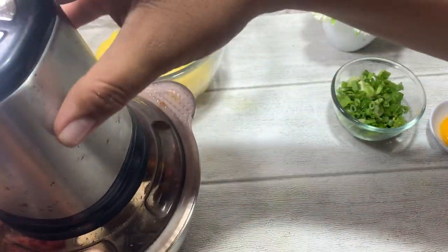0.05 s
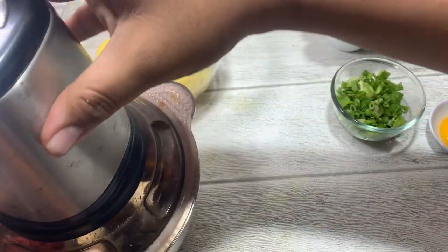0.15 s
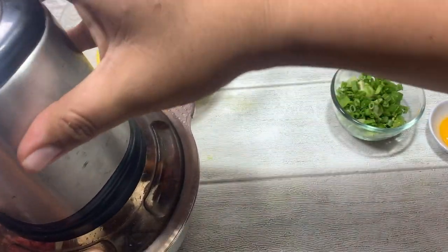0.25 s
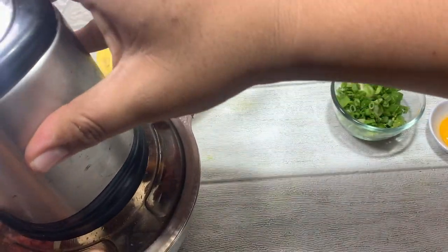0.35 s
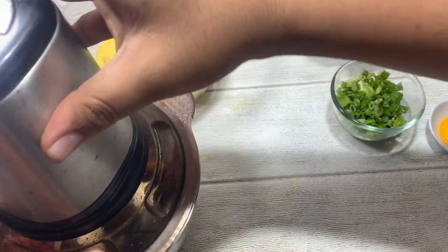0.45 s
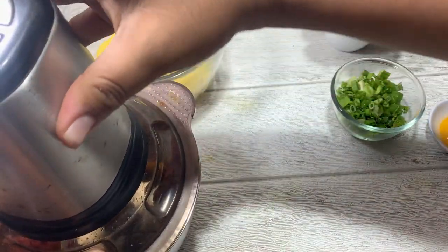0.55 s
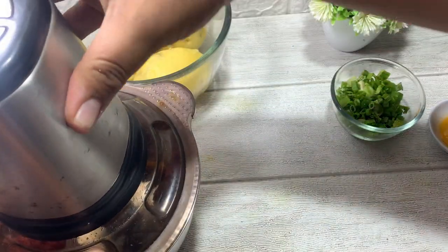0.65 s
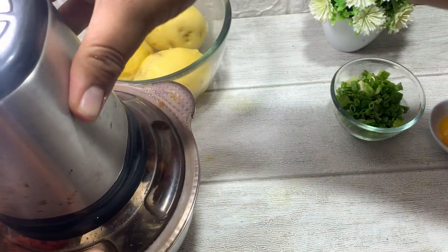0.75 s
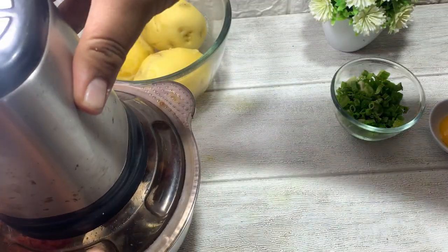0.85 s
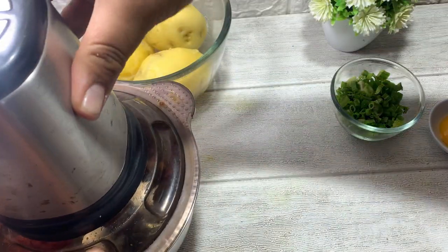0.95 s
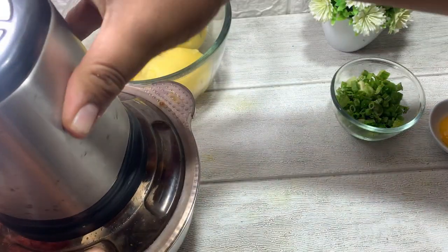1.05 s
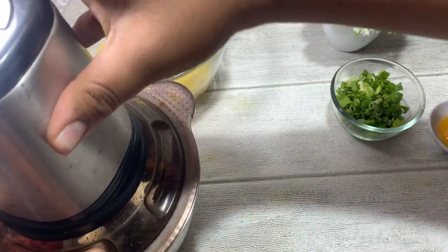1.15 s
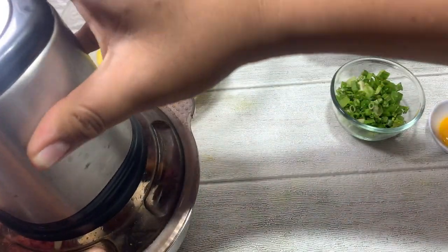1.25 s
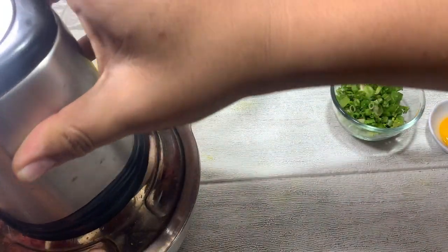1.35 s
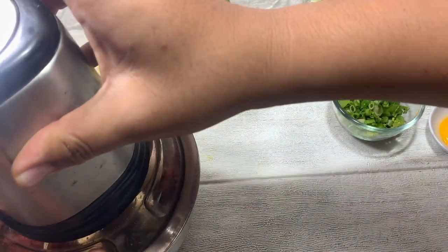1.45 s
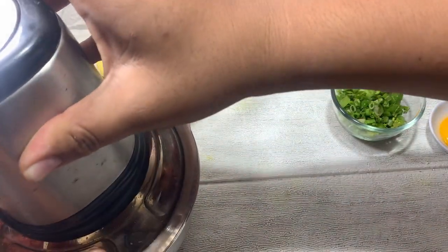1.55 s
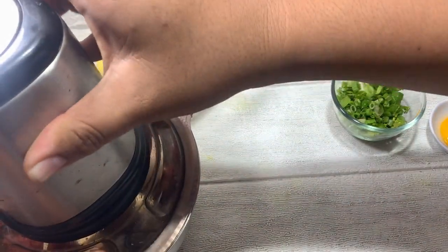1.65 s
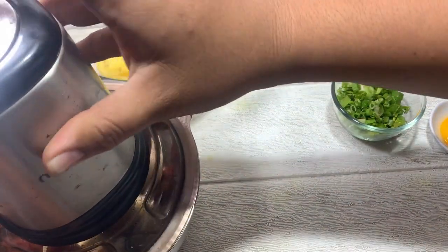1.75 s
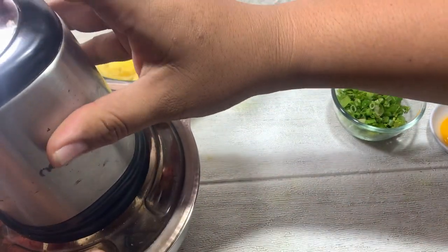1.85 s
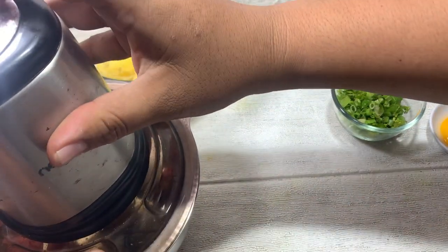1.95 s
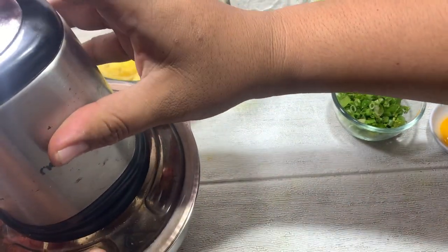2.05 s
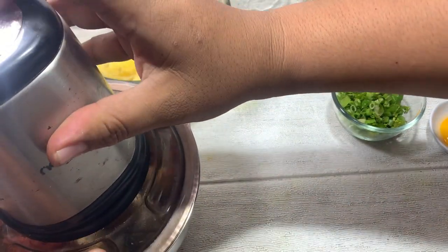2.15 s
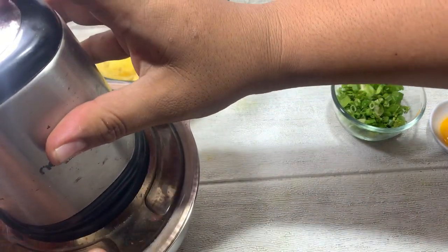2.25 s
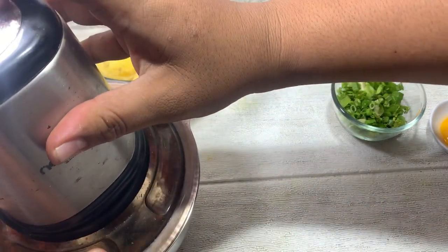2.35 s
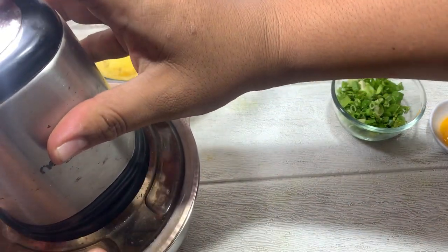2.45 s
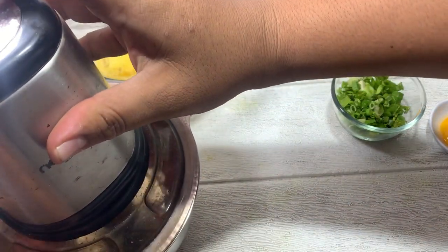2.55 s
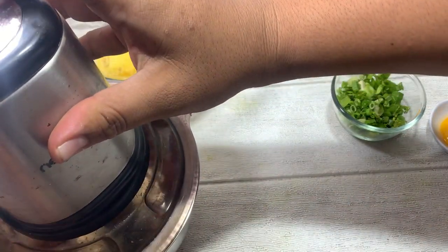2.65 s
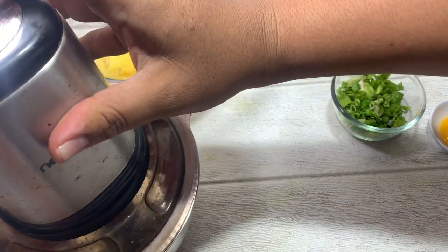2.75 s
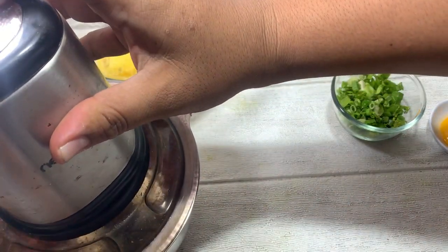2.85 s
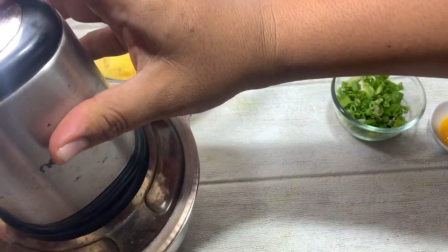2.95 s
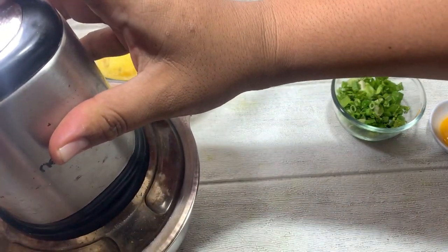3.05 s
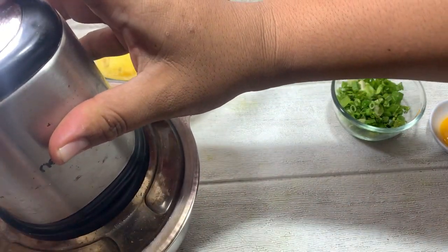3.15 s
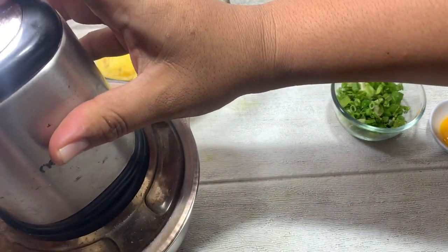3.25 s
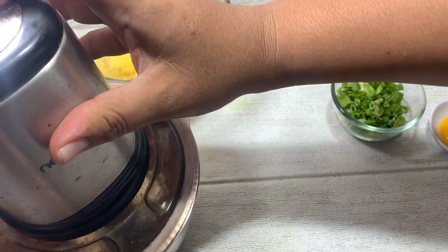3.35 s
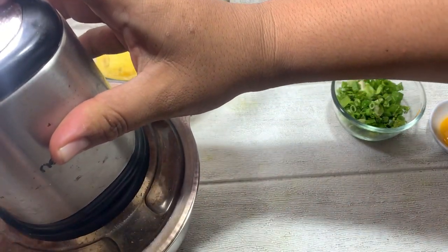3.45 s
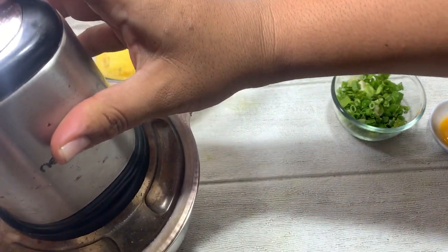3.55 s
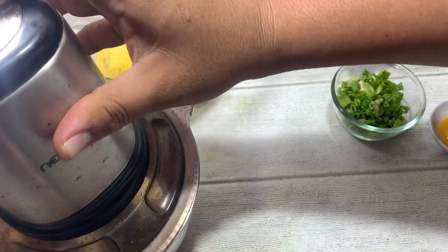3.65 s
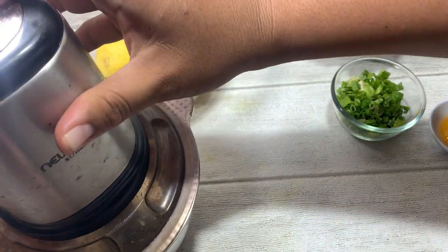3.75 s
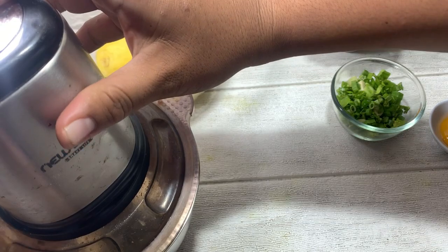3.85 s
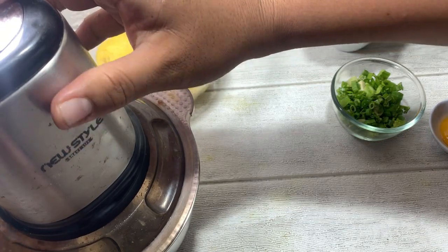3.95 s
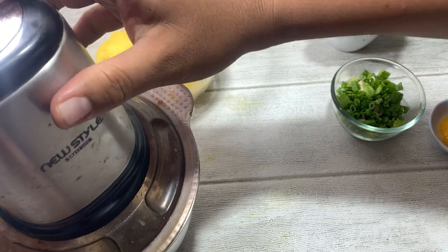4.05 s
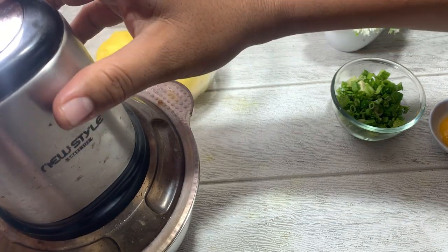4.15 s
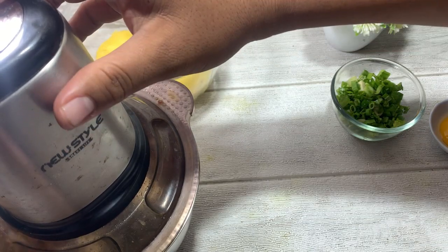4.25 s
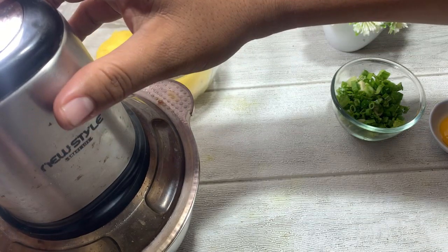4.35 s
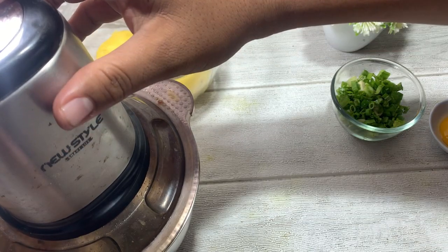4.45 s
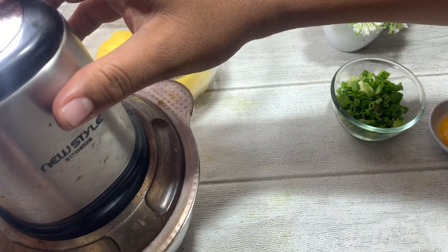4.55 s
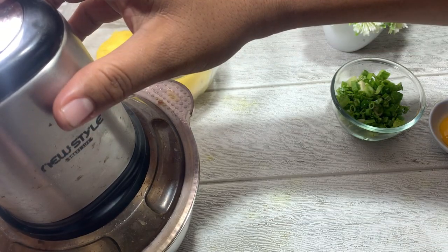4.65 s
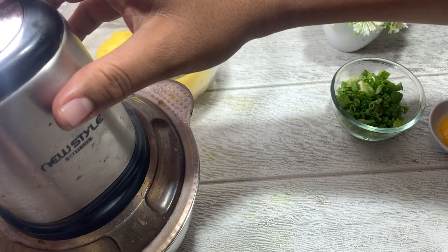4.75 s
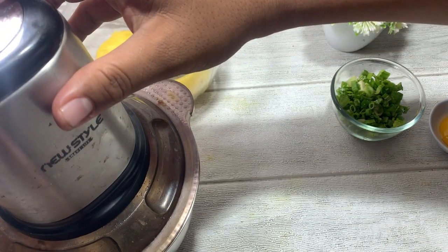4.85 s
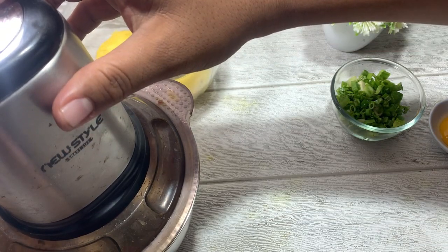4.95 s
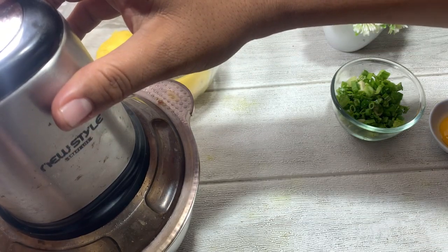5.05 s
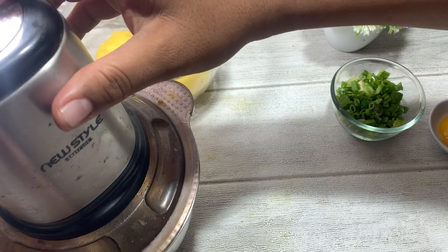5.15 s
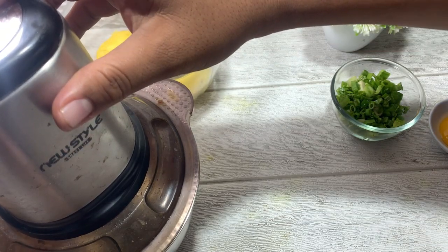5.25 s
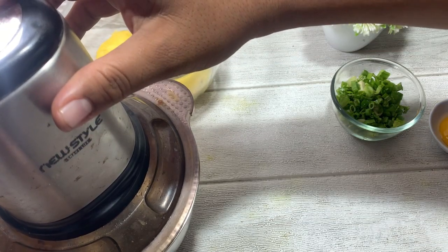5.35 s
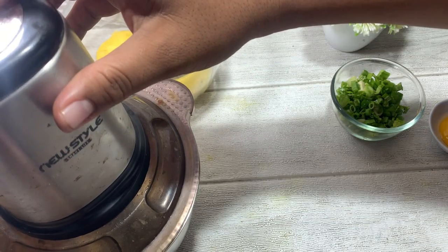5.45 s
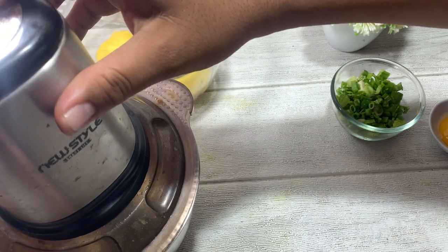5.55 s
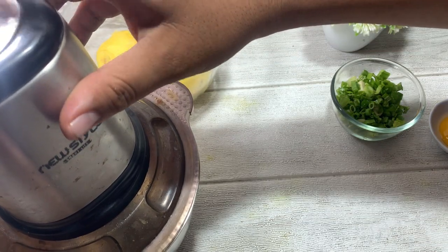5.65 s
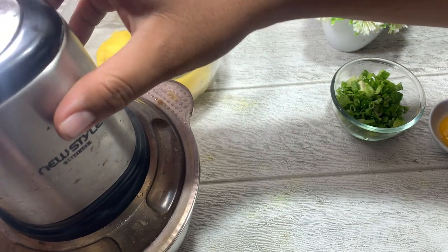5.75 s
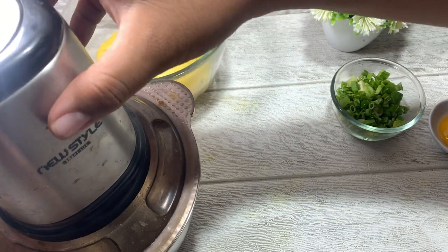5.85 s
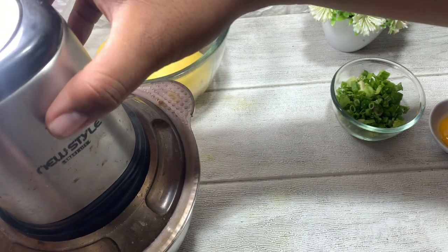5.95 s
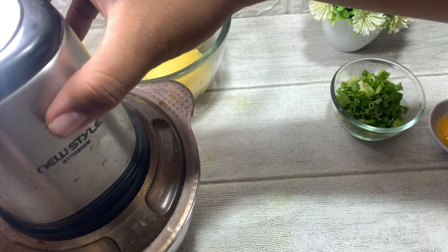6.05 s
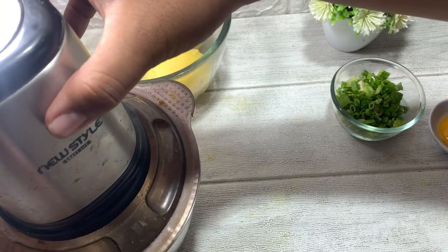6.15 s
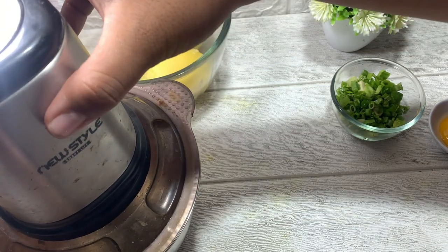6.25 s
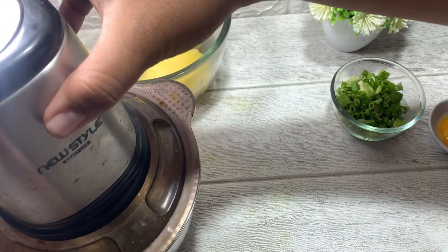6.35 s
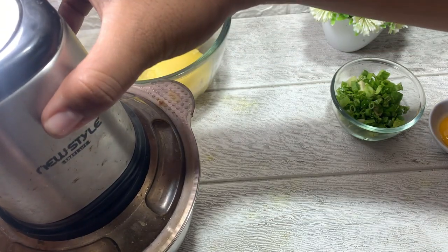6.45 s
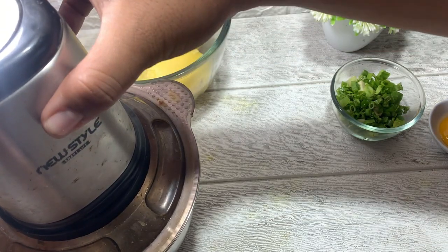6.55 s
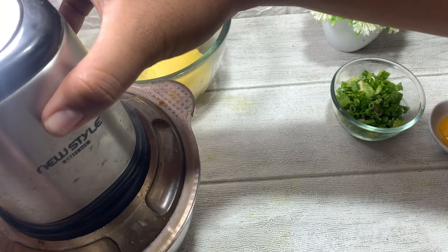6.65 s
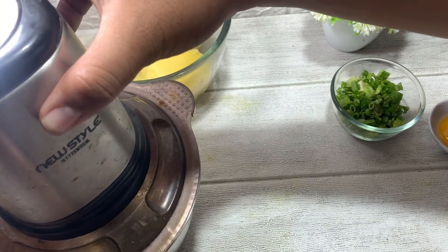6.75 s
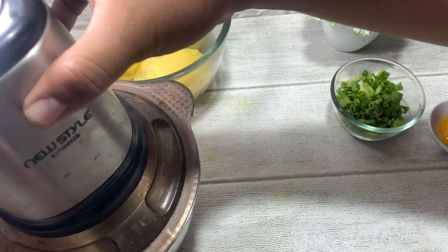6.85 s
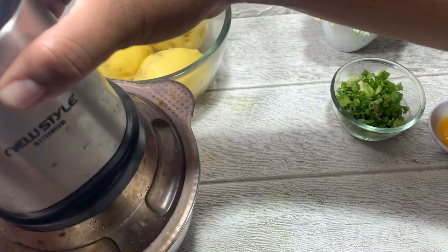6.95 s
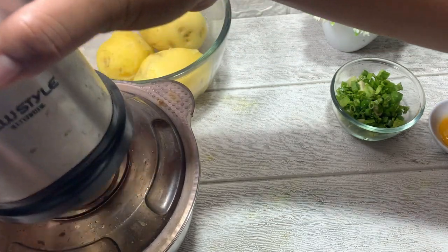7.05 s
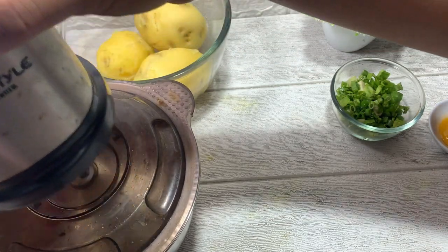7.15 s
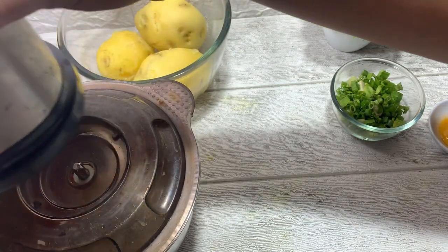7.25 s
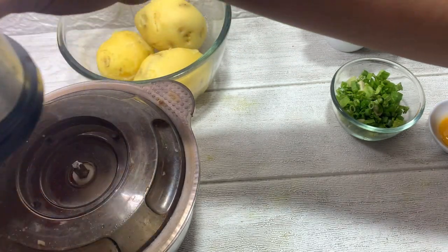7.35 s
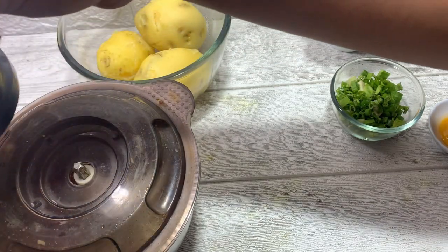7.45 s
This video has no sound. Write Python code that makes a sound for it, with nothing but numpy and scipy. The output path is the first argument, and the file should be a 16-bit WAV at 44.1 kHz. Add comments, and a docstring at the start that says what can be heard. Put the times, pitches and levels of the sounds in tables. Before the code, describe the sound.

A quiet kitchen, heard close in stereo with a short reverberation. Soft rumble, shuffling hands, a faint treble buzz and a thin wavering whistle lie behind. At 0.2-0.4 s light knocks sound on a lid, with a brief low rubbing tone; small contacts follow near 0.8 and 1.1. At 1.4 s the motor head drops home with a loud clunk, a table boom, a dying rattle and a dry finger scuff. At 2.2 s the chopper starts abruptly, spinning up quickly into a harsh, dense grind with motor whine, blade ring and lumpy knocks. Bright ticks on steel crowd 2.3-4.3, then thin out while the pitch slowly climbs. At about 5.7 s the switch is released: the bowl shudders, pitch falls, treble fades and churning slows into separate knocks, stopping by 7.0. Small soft knocks of lifting the head run to 7.5.

```python
"""In a quiet kitchen a hand seats the motor head of an electric food chopper, runs it and lets it coast to rest.
Random contacts of blades, food and gears excite the damped modes of housing and bowl; the rotor adds tones
in step with its turning. Hard bits tick on the steel, lumps knock, the lid rubs and sings.
Rumble, shuffling hands, a treble buzz and a thin whistle lie behind, and the room returns a short reverberation."""
import sys
import numpy as np
from scipy import signal
from scipy.fft import rfft, irfft, next_fast_len
from scipy.io import wavfile
from scipy.ndimage import uniform_filter1d, minimum_filter1d

SR = 44100
rng = np.random.default_rng(int(sys.argv[2]) if len(sys.argv) > 2 else 0)


def wav_record(signal):
    """Record a signal, one row per channel, as 16-bit PCM in the file named by sys.argv[1]."""
    frames = np.transpose(np.atleast_2d(signal))
    bounded = np.clip(frames, -1, 1)
    # unit amplitude maps onto the largest positive 16-bit level
    quanta = np.round(bounded * 32767).astype(np.int16)
    wavfile.write(sys.argv[1], SR, quanta)


def amplitude_ratio(level_db):
    """Convert a level in decibels to the matching linear amplitude (field) ratio."""
    exponent = np.asarray(level_db, float) / 20
    return 10 ** exponent


N = 330309

ON_S, OFF_S, STOP_S = 2.19, 5.66, 7.03    # switch pressed, switch let go, rotor at rest
FULL_SPEED = 370    # turns per s
TURNS_PER_PASS = 7.2    # rotor turns per blade pass
TABLE_BOOM_S, SCUFF_S = 1.42, 1.545    # the head drops home; a finger scuffs the lid


def rms_one(x):
    """Normalization: scales to unit mean power."""
    return x / np.sqrt(np.mean(x ** 2) + 1e-20)


def in_time(rows, outside=None):
    """Linear interpolation: the columns of a table at every sample."""
    s, *columns = np.transpose(rows)
    time = np.arange(N) / SR
    return [np.interp(time, s, column, outside, outside) for column in columns]


def drift(rate):
    """Low-passed noise: slow random change of spread 1, with rate in Hz."""
    r = np.exp(-80 * np.pi * rate / SR)    # computed at every 40th sample
    slow = signal.lfilter([1], [1, -2 * r, r * r], rng.standard_normal(N // 40 + 2002))[2000:]
    return np.interp(np.arange(N) / 40, np.arange(len(slow)), rms_one(slow))


def band(x, order, low_hz, high_hz):
    """Band-pass filtering: keeps the range between two corner frequencies."""
    return signal.sosfilt(signal.butter(order, [low_hz, high_hz], "band", fs=SR, output="sos"), x)


def dying(start_s, db, t60, rise_s):
    """Exponential decay: a gain that swells quickly and falls 60 dB in t60 seconds."""
    after = np.maximum(np.arange(N) / SR - start_s, 0)
    return amplitude_ratio(db - 60 * after / t60) * (1 - np.exp(-after / rise_s))


def resonate(x, hz, width_hz):
    """Damped resonance: a two-pole mode with gain 1 at its peak."""
    r = np.exp(-np.pi * width_hz / SR)
    poles = [1, -2 * r * np.cos(2 * np.pi * hz / SR), r * r]
    return signal.lfilter([(1 - r * r) / 2, 0, (r * r - 1) / 2], poles, x + 1e-18)


def body(x, low_hz, high_hz):
    """Modal superposition: the housing and bowl modes that lie in a range, in parallel."""
    # modes of housing and bowl: f/Hz, width/Hz, level/dB
    modes = [(76, 20, -6), (108.6, 27, -1.5), (136.2, 27.5, 2.5), (196.8, 44, 2), (295.4, 80.7, 6),
             (365.7, 94, 5), (483.5, 103.4, -4.5), (565, 19, -12), (633.4, 70, -15), (788, 207, -8),
             (950, 130, -5), (1130, 85, -4.5), (1242, 112, -8), (1556, 190, -10.5), (1740, 183, -14.5),
             (1890, 950, -44), (2459, 42, 13), (2930, 304, -13), (3170, 246, -11.5), (4416, 520, -27.5),
             (4820, 93, -36), (5790, 270, -27), (6600, 1600, -29.5), (8240, 420, -17.5), (9980, 440, -22.5),
             (11050, 230, -20), (11700, 6000, -30), (14200, 3000, -37), (15760, 330, -30)]
    out = 0
    for k, (hz, width_hz, db) in enumerate(modes):
        if low_hz < hz < high_hz:
            out = out + (-1) ** k * amplitude_ratio(db) * resonate(x, hz, width_hz)
    return out


def gripped(x):
    """Frequency modulation: modes slide a little in pitch as the hand's pressure changes."""
    sway_s, changes_per_s = .0008, 3.5
    heard_at = np.arange(N) + sway_s * SR * drift(changes_per_s)
    return rms_one(np.interp(heard_at, np.arange(N), x))


def grains(per_s, spread_db):
    """Shot noise: random contacts of uneven size and sign, at unit power."""
    sizes = amplitude_ratio(spread_db * np.minimum(rng.exponential(1, N), 4)) * rng.choice([-1, 1], N)
    return rms_one(sizes * (rng.random(N) < per_s / SR))


def bursts(rows, decay_s, sharp, rise_s=0.0026):
    """Impulsive excitation: each event (s, dB) is a click and a short puff of noise that swells and dies."""
    clicks = np.zeros(N)
    clicks[[round(s * SR) for s, db in rows]] = amplitude_ratio(np.array(rows)[:, 1])
    fall, rise = np.exp(-1 / (decay_s * SR)), np.exp(-1 / (rise_s * SR))
    puff = signal.lfilter([1 - rise], np.convolve([1, -fall], [1, -rise]), clicks + 1e-18)
    return sharp * clicks + puff * rng.standard_normal(N)


def wavering(cycles, wander, sway_db, rate=8):
    """Phase and amplitude modulation: a sine that wanders by radians and by dB."""
    sine = np.sqrt(2) * np.sin(2 * np.pi * cycles + wander * drift(rate))
    return sine * amplitude_ratio(sway_db * drift(4.4))


def motor(speed, turns):
    """Shot-noise excitation of modes: contacts come faster with speed and bunch at each blade pass."""
    # the run: t/s, table rumble level/dB, gear rattle level/dB
    run_levels = [(2.17, -53, -56), (2.205, -12, -13), (2.27, -19, -18.5), (2.6, -16, -20.5),
                  (2.72, -18.5, -20), (3.09, -17, -18), (3.3, -22, -18), (3.84, -17.5, -18.5),
                  (4.41, -21.5, -18.5), (5.0, -18.5, -17), (5.22, -22.5, -20), (5.52, -15, -16),
                  (5.82, -16, -21), (6.03, -21.5, -20), (6.5, -31.5, -29), (6.68, -41, -36),
                  (7.0, -42, -48), (7.04, -73, -89)]
    # each layer: level/dB at full run, share of the rattle's swing,
    # level change/dB per s as the food gets finer, level change/dB per doubling of speed
    thump_rule, blade_ring_rule = (-18.5, 0.92, -2.07, 1), (-36.5, -0.66, -0.5, 15)
    gear_grind_rule, whirr_rule = (-34, 1.06, -1.5, 7), (-43, 0.9, -0.96, 9)
    air_hiss_rule, sizzle_rule = (-36.5, 0.72, -2.5, 12.5), (-44, 0.8, -0.5, 1)
    full_rattle_db, mid_run_s = -20, 4
    quiet_speed, ringing_speed = 105, 128    # turns per s between which the blades begin to ring
    fling_speed, fling_loss_db = 215, 16    # turns per s; below it the treble loses dB per halving of speed

    rumble_db, rattle_db = in_time(run_levels, outside=-120)
    mincing_s = np.clip(np.arange(N) / SR, ON_S, OFF_S) - mid_run_s
    running = rattle_db > -100

    def gain(db, follows, db_per_s, db_per_octave):
        """Power laws: level of a layer from rattle, fineness of the food and speed."""
        level_db = db + follows * (rattle_db - full_rattle_db) + db_per_s * mincing_s
        return running * amplitude_ratio(level_db + db_per_octave * np.log2(speed / FULL_SPEED))

    passes = np.cos(2 * np.pi * turns / TURNS_PER_PASS + 3.1 * drift(5.5))
    passes = passes * 6.5 * np.clip(1 - speed / FULL_SPEED, 0, 1)    # passes stand apart at low speed
    lumps = drift(20.4) * (1.2 - 0.2 * mincing_s)    # lumps even out as the food gets finer
    busy = speed + 150    # loose food keeps tumbling at low speed

    thump = grains(2.5 * busy, spread_db=3.5) * amplitude_ratio(2.0 * passes + 2.0 * lumps)
    rattle = grains(7.0 * busy, spread_db=2.0) * amplitude_ratio(1.17 * passes + 0.4 * lumps + 0.6 * drift(91))
    whirr = grains(18 * busy, spread_db=4.5) * amplitude_ratio(0.3 * passes + 2.0 * lumps)
    hiss = grains(30 * busy, spread_db=4.5) * amplitude_ratio(1.1 * lumps + 2.0 * drift(70))

    out = amplitude_ratio(rumble_db) * rms_one(body(thump, low_hz=0, high_hz=240))
    out += gain(*thump_rule) * amplitude_ratio(1.0 * drift(2.0)) * gripped(body(thump, low_hz=240, high_hz=600))

    ringing = gain(*blade_ring_rule) * np.clip((speed - quiet_speed) / (ringing_speed - quiet_speed), 0, 1) ** 2
    ringing = ringing * amplitude_ratio(1.3 * drift(5.3) + 0.72 * passes)
    # the blades ring up as the teeth sweep through their mode
    ring_up = resonate(resonate(whirr, hz=2496, width_hz=66), hz=2496, width_hz=3 * 66)
    out += dying(2.365, db=-24, t60=0.9, rise_s=0.017) * rms_one(ring_up)
    out += ringing * rms_one(body(whirr, low_hz=2200, high_hz=2620))

    low_rattle = gripped(body(rattle, low_hz=600, high_hz=1200))
    high_rattle = gripped(body(rattle, low_hz=1200, high_hz=2200))
    out += amplitude_ratio(rattle_db) * (low_rattle + amplitude_ratio(-1.7) * high_rattle) / np.sqrt(2)
    out += gain(*gear_grind_rule) * rms_one(body(whirr, low_hz=2620, high_hz=3600))

    flung = amplitude_ratio(fling_loss_db * np.log2(np.minimum(speed / fling_speed, 1)))
    out += flung * gain(*whirr_rule) * rms_one(body(whirr, low_hz=3600, high_hz=5200))
    air = rms_one(body(hiss, low_hz=5200, high_hz=13500))
    out += flung * gain(*air_hiss_rule) * amplitude_ratio(0.49 * drift(3.8)) * air
    sizzle = body(grains(40 * busy, spread_db=-3.0), low_hz=13500, high_hz=SR)
    out += flung * gain(*sizzle_rule) * rms_one(sizzle)
    return out


def rotor_tones(speed, turns):
    """Order tones: imbalance once a turn, multiples of the blade pass, gear teeth and a phase-modulated whine."""
    # commutator whine: t/s, level/dB
    whine_levels = [(2.22, -65), (2.3, -47), (2.34, -38), (2.37, -39), (2.42, -58), (3.2, -56), (3.6, -50),
                    (3.9, -45), (4.8, -42), (5.66, -43), (5.76, -49), (5.9, -70)]
    # upper harmonics of the tooth rate come and go: t/s, 3rd level/dB, 4th level/dB
    upper_levels = [(4.15, -70, -68), (4.4, -58, -53), (4.65, -50, -55), (4.95, -51, -62), (5.3, -57, -70),
                    (5.62, -56, -70), (5.7, -75, -75)]
    # orders as multiples of the blade pass rate: blade orders, with planet-gear tones at 5.37 and 6.4
    multiples = [1, 2, 2.5, 3, 4, 5, 5.37, 6, 6.4, 9]
    # level/dB of each order
    multiple_levels = [-8.5, -4, -0.7, -4.5, -3.4, -1, -8, 2.5, -5, -9.5]
    mount_hz, mount_q = 340, 5    # imbalance shakes the head on its mount
    teeth, whine_order = 10, 17.4    # cycles per turn
    teeth_rise_s = .14

    time = np.arange(N) / SR
    turning = (time > ON_S) & (time < STOP_S)
    coasting = np.clip((time - OFF_S) / .12, 0, 1)
    ratio = speed / mount_hz
    shake = ratio ** 4 / np.abs(1 - ratio ** 2 + 1j * ratio / mount_q)    # acceleration under rotating unbalance
    out = shake * amplitude_ratio(-35 - 20 * coasting) * wavering(turns, wander=.35, sway_db=1.8)

    # pinion teeth bite hardest under the starting load, then ease to a floor and fade on the coast
    teeth_db = np.maximum(-45 - 8 * (time - ON_S - teeth_rise_s), -56)
    teeth_db = teeth_db - 28 * np.maximum(time - OFF_S, 0)
    # the tooth tone swells as it crosses a housing mode at 3210 Hz
    teeth_db = teeth_db + (1 - coasting) * 9 / (1 + ((teeth * speed - 3210) / 60) ** 2)
    bite = np.clip((time - ON_S) / teeth_rise_s, 0, 1) ** 2
    out += bite * amplitude_ratio(teeth_db) * wavering(teeth * turns, wander=1.5, sway_db=3, rate=40)
    for harmonic, db in zip((3, 4), in_time(upper_levels, outside=-120)):
        out += amplitude_ratio(db) * wavering(harmonic * teeth * turns, wander=1.2, sway_db=2, rate=40)

    whine_db, = in_time(whine_levels, outside=-120)
    passes = turns / TURNS_PER_PASS
    flutter = 2.0 * np.sin(2 * np.pi * passes) / (2 * np.pi)    # sidebands from the blades
    out += amplitude_ratio(whine_db) * wavering(whine_order * turns + flutter, wander=1.7, sway_db=1.5, rate=80)

    orders_db = -27 + .14 * (speed - FULL_SPEED) - 3 * coasting    # blade and gear orders grow with speed
    for multiple, db in zip(multiples, multiple_levels):
        out += amplitude_ratio(orders_db + db) * wavering(multiple * passes, wander=.4, sway_db=3.5)
    return turning * out


def shudder():
    """Swept tone by phase integration: the bowl shudders on the table as the switch is let go."""
    # pitch and strength of the shudder: t/s, f/Hz, level/dB
    sag = [(5.6, 218, -32), (5.655, 214, -11), (5.74, 200, -10), (5.85, 191, -10), (5.885, 189, -14),
           (5.91, 188, -24), (5.97, 186, -24), (6.02, 185, -40)]
    hz, db = in_time(sag)
    inside, = in_time([(sag[0][0], 1), (sag[-1][0], 1)], outside=0)
    return inside * amplitude_ratio(db) * wavering(np.cumsum(hz) / SR, wander=.2, sway_db=.8)


def ticks():
    """Impact excitation: hard bits ring the thin high modes of the steel, small ones at random."""
    # the loudest hard bits on steel: t/s, level/dB
    loudest = [(2.2717, -9.5), (2.3295, -10), (2.3789, -13), (2.396, -9), (2.4123, -13), (2.581, -17),
               (2.6129, -12), (2.685, -16), (2.7047, -9.5), (2.9057, -12), (2.9661, -8), (3.1023, -9.5),
               (3.207, -9), (3.2968, -12), (3.3587, -8), (3.4126, -7.5), (3.5887, -5), (3.676, -5.5),
               (3.8182, -7.5), (4.0342, -6), (4.0436, -1), (4.1604, -10), (4.1903, -5.5), (4.2472, -3.5),
               (4.8024, -17), (5.2314, -7), (5.8151, -9)]
    thinning_s = 1.4    # small ticks grow rarer as the food gets finer
    when, size = rng.random((80, 2)).T
    share = 1 - np.exp(-(OFF_S - ON_S) / thinning_s)
    small_s = ON_S - thinning_s * np.log(1 - share * when)
    small = np.c_[small_s, -23 + 17 * (2 * size - 1)]
    hits = bursts(np.r_[loudest, small], decay_s=0.00053, sharp=1.06, rise_s=0.0012)
    rung = amplitude_ratio(31.5) * body(hits, low_hz=4000, high_hz=SR)
    return band(rung, 2, low_hz=8000, high_hz=12600) + amplitude_ratio(-8) * rung


def knocks():
    """Impact excitation: each knock drives low, middle and high modes unequally and rings where it strikes."""
    # head set on the lid and lifted off: t/s, level/dB, low push level/dB and brightness level/dB
    # (both against the knock), ring f/Hz, ring decay/s
    handling = [(0.162, -27, -5, -37, 1165, 0.0022), (0.251, -27.5, -0.5, -41, 1090, 0.0048),
                (0.363, -39, -12, -42, 600, 0.0036), (0.409, -39.5, 8, -44, 1260, 0.0033),
                (0.753, -39, -5, -40, 1060, 0.0038), (1.1, -32.5, -12, -36, 990, 0.00097),
                (1.287, -25.5, -4, -30.5, 1234, 0.0052), (1.392, -23.5, 4, -35, 870, 0.0029),
                (1.4, -14, 2.5, -33, 1000, 0.0012), (1.408, -6, -4, -33.5, 1334, 0.0023),
                (1.4181, -23, 7, -51, 1090, 0.0044), (1.789, -41.5, 7, -48, 555, .008),
                (7.075, -46, 9, -29, 1100, .003), (7.104, -43, 3, -44, 1050, .004),
                (7.124, -30, -3, -51, 980, 0.0042), (7.135, -30.5, -7, -58, 1293, 0.0028),
                (7.17, -35.5, -12, -50, 1200, 0.0025), (7.214, -37, -12, -38, 1190, 0.0036),
                (7.285, -48, -2, -40, 1010, 0.0038), (7.308, -47, 6, -27, 1440, 0.003),
                (7.44, -47, 9, -33, 930, 0.0045)]
    # blades on lumps: t/s, level/dB, ring f/Hz
    lump_hits = [(2.192, -15.5, 960), (2.235, -17, 1630), (2.271, -4.5, 1490), (2.331, -15, 950),
                 (2.396, -8.5, 960), (2.612, -13.5, 1280), (3.02, -13, 1290), (3.232, -10, 950),
                 (3.298, -6.5, 1340), (3.923, -12, 950), (4.075, -11, 950), (4.197, -17, 1260),
                 (4.448, -11, 1290), (4.93, -15, 950), (5.28, -10.5, 1290), (5.365, -12, 950),
                 (5.454, -14, 1400), (5.756, -13, 1370), (5.857, -19, 1270), (6.034, -14, 950),
                 (6.227, -11, 934), (6.293, -24, 1250), (6.333, -16, 1090), (6.392, -17.5, 950),
                 (6.552, -16, 940), (6.629, -28, 960), (6.808, -30, 1500), (6.863, -28, 870),
                 (6.909, -30, 1230), (6.947, -21.5, 1120), (6.964, -42, 1170), (6.981, -29, 1260),
                 (6.988, -28, 1100), (7.014, -34, 1220)]
    # lump knocks dull by 2 dB per s
    lumps = [(s, db, -10, -45 - 2 * (s - ON_S), hz, 0.0024) for s, db, hz in lump_hits]
    s, db, low, bright, ring_hz, ring_s = np.transpose(handling + lumps)

    push = bursts(np.c_[s, db + low], decay_s=0.0036, sharp=4.9, rise_s=0.00079)
    out = amplitude_ratio(21.5) * body(push, low_hz=0, high_hz=600)
    middle = bursts(np.c_[s, db], decay_s=0.0032, sharp=3.8, rise_s=0.0012)
    out += amplitude_ratio(22.5) * body(middle, low_hz=600, high_hz=2200)
    out += amplitude_ratio(18.0) * resonate(bursts(np.c_[s, db], decay_s=0.0019, sharp=1.4), hz=640, width_hz=70)
    # soft contacts carry little treble
    out = signal.sosfilt(signal.butter(4, 3000, fs=SR, output="sos"), out)

    crack = bursts(np.c_[s, db + bright], decay_s=0.0012, sharp=2.0, rise_s=0.0008)
    out += amplitude_ratio(47) * body(crack, low_hz=2620, high_hz=13500)
    out += amplitude_ratio(44.0) * resonate(crack, hz=2900, width_hz=310)

    after = np.arange(SR // 12) / SR
    for start, level_db, hz, decay_s in zip(s, db, ring_hz, ring_s):
        ring = np.sin(2 * np.pi * hz * after) * np.exp(-after / decay_s) * (1 - np.exp(-after / 0.0014))
        at = round(start * SR)
        out[at:at + len(ring)] += amplitude_ratio(level_db + 7.5) * ring[:N - at]
    return out


def lid_rattle():
    """Shot noise in lower middle modes: the lid rattles on, dying away, after the head drops home."""
    slips = grains(700, spread_db=-0.5)
    rung = rms_one(body(slips, low_hz=450, high_hz=1200))
    rung = rung + amplitude_ratio(-15) * rms_one(body(slips, low_hz=1200, high_hz=2200))
    return dying(TABLE_BOOM_S, db=-31, t60=0.73, rise_s=.004) * rung


def singing():
    """Friction tones: the bowl sings under the rubbing lid; each rub swells, holds and fades as its pitch sags."""
    # rubs: t/s, length/s, f/Hz, level/dB
    rubs = [(0.383, 0.16, 368.5, -38.5), (.8, 0.045, 827, -51), (0.838, 0.061, 557, -66),
            (1.522, 0.091, 374, -36)]
    rise_db_s, fall_db_s, sag_hz_s = 302, 137, 45
    out = 0
    for start, length, hz, db in rubs:
        after = np.arange(N) / SR - start
        level_db = db - rise_db_s * np.maximum(-after, 0) - fall_db_s * np.maximum(after - length, 0)
        cycles = hz * after - sag_hz_s * after ** 2 / 2
        out = out + amplitude_ratio(level_db) * wavering(cycles, wander=.25, sway_db=1.5)
    return out


def scuff():
    """Friction as shot noise: dense tiny slips of a finger on the lid, a dry hiss that dulls as it dies."""
    slips = grains(4000, spread_db=2.0)
    low, high = band(slips, 2, 1300, 2600), band(slips, 2, 3000, 7200)
    out = dying(SCUFF_S, db=-40, t60=0.29, rise_s=0.003) * rms_one(low)
    return out + dying(SCUFF_S, db=-55, t60=0.13, rise_s=.001) * rms_one(high)


def rumble_and_shuffle():
    """Filtered noise: lumpy rumble and the shuffle of hands; the table booms on after the head drops home."""
    # hands and room: t/s, rumble level/dB, shuffle level/dB
    levels = [(0, -37.5, -60), (.54, -36, -50), (.85, -45.5, -54.5), (1.06, -48.5, -54), (1.35, -37, -48),
              (1.85, -41.5, -55.5), (2.1, -40.5, -53), (5.9, -28.5, -55), (6.4, -26, -57),
              (6.98, -33, -50.5), (7.04, -44, -57), (7.2, -44.5, -56), (7.3, -51.5, -54),
              (7.49, -45.5, -58)]
    # spectrum of the shuffle: f/Hz, level/dB per Hz
    colour = [(150, -44), (250, -57), (318, -54), (423, -4), (736, -4), (921, -3), (1510, -4.5),
              (2100, -30), (2750, -18.5), (3770, -19.5), (5330, -34), (9000, -23), (11700, -66),
              (19800, -120)]
    rumble_db, shuffle_db = in_time(levels)
    rumble_gain = amplitude_ratio(rumble_db) + dying(TABLE_BOOM_S, db=-21, t60=0.47, rise_s=0.0066)
    shuffle_gain = amplitude_ratio(shuffle_db) + dying(SCUFF_S, db=-36, t60=0.23, rise_s=0.006)
    shuffle_gain = shuffle_gain + dying(TABLE_BOOM_S, db=-53, t60=0.26, rise_s=.01)

    rumble = band(rng.standard_normal(N), 2, low_hz=46, high_hz=200)
    hz = np.maximum(np.fft.rfftfreq(N, 1 / SR), 1)
    point_hz, point_db = np.transpose(colour)
    weight = amplitude_ratio(np.interp(np.log(hz), np.log(point_hz), point_db))
    shuffle = irfft(rfft(rng.standard_normal(N)) * weight, N)
    out = rumble_gain * amplitude_ratio(3.2 * drift(27)) * rms_one(rumble)
    return out + shuffle_gain * amplitude_ratio(1.5 * drift(5.5)) * rms_one(shuffle)


def treble_buzz():
    """Periodic pulse excitation: 120 uneven noise puffs a second in a treble band, with steady tones."""
    # tones in the buzz: f/Hz, level/dB against the buzz
    tones = [(10061, -17), (11278, -10), (11563, -5)]
    time = np.arange(N) / SR
    s = np.arange(.0045, N / SR - .01, 1 / 120)
    # four pulses in turn: level/dB and random spread/dB
    spark_db = np.resize([0, -20, -11, -20], len(s)) + np.resize([2, 6, 6, 4], len(s)) * rng.standard_normal(len(s))
    sparks = bursts(np.c_[s, spark_db], decay_s=.001, sharp=5) + .03 * rng.standard_normal(N)
    sparks = band(sparks, 6, low_hz=8700, high_hz=12400)
    buzz = rms_one(body(sparks, low_hz=9000, high_hz=13000))
    for tone_hz, db in tones:
        buzz += amplitude_ratio(db) * wavering(tone_hz * time, wander=.7, sway_db=2, rate=30)
    return amplitude_ratio(-57.5) * buzz


def whistle():
    """Amplitude-modulated sine: a thin high whistle wavers in level."""
    # strength of the whistle: t/s, level/dB
    levels = [(0, -59), (.55, -59), (.85, -48), (1.3, -53), (1.7, -64), (2.1, -61), (7.0, -67), (7.15, -46),
              (7.49, -53)]
    whistle_db, = in_time(levels)
    return amplitude_ratio(whistle_db) * wavering(15624 * np.arange(N) / SR, wander=.3, sway_db=-5.5)


def kitchen(x):
    """Reverberation by recirculating delays: twelve a side, duller on every round."""
    t60_s, wall_cut_hz = 0.16, 4100
    size = next_fast_len(N + SR)
    hz = np.fft.rfftfreq(size, 1 / SR)
    spectrum, out = rfft(x, size), np.zeros((2, len(hz)), complex)
    for k, lag in enumerate(rng.uniform(.006, .03, 24)):
        loop = amplitude_ratio(-60 * lag / t60_s) / (1 + 1j * hz / wall_cut_hz) * np.exp(-2j * np.pi * hz * lag)
        out[k % 2] += loop / (1 - loop) * (-1) ** (k // 2)
    # little comes back in the low middle
    out *= 1 / (1 + (520 / (hz + 1)) ** 4) + 1.05 / (1 + (hz / 110) ** 4)
    return irfft(out * spectrum, size)[:, :N]


def stereo_widener(x, difference):
    """All-pass widening: left and right share one sound, turned in phase by frequency, and a second sound
    enters them with opposite sign."""
    # widener: f/Hz, phase by which left leads/rad
    phase_lead = [(0, -.5), (80, .2), (150, .7), (300, 3.0), (400, 4.3), (500, 5.7), (560, 7.4), (750, 9.4),
                  (1300, 18.6), (1600, 18.6), (2400, 17.6), (2800, 15.7), (3200, 15.2), (3800, 12.6),
                  (4800, 13.0), (5000, 15.7), (5400, 15.7), (6300, 18.7), (7000, 19.2), (7500, 16.9),
                  (8200, 16.3), (8700, 15.0), (10500, 13.0), (11500, 12.3), (13100, 9.6), (13800, 9.2),
                  (15600, 6.3)]
    size = next_fast_len(N + SR // 4)
    lead = np.interp(np.fft.rfftfreq(size, 1 / SR), *np.transpose(phase_lead))
    difference = difference - 0.65 * resonate(difference, hz=203, width_hz=256)
    signs = np.array([[1], [-1]])    # the difference enters left and right with opposite sign
    return irfft(rfft(x + difference * signs, size) * np.exp(.5j * lead * signs), size)[:, :N]


def scene():
    """Superposition of direct and reverberant sound: the chopper close by, in its room."""
    # the rotor: t/s, speed/turns per s
    rotor_speed = [(2.19, 120), (2.27, 205), (2.33, 240), (2.4, 270), (2.6, 312), (2.8, 327), (3.0, 335),
                   (3.6, 353), (4.2, 372), (4.8, 382), (5.3, 392), (5.64, 401), (5.8, 355), (6.1, 270),
                   (6.6, 170), (7.03, 90)]
    speed, = in_time(rotor_speed)
    turns = np.cumsum(speed) / SR
    steady = motor(speed, turns) + rotor_tones(speed, turns) + shudder() + ticks()
    steady = steady + lid_rattle() + singing() + scuff()
    steady = steady + rumble_and_shuffle() + treble_buzz() + whistle()
    blows = knocks()
    # a second independent motor noise, opposite in sign left and right, widens the stereo
    difference = amplitude_ratio(-12.5) * motor(speed, turns)
    direct = stereo_widener(steady + blows, difference) * amplitude_ratio([[-.2], [.2]])
    # knocks close by wake less of the room
    return direct + amplitude_ratio(-13.5) * kitchen(steady + amplitude_ratio(-3.5) * blows)


def limiter(x, top, release_db_s):
    """Peak limiting: the gain ducks just ahead of peaks and recovers at a steady rate."""
    over_db = np.maximum(20 * np.log10(np.abs(x).max(axis=0) / top + 1e-9), 0)
    ramp = release_db_s * np.arange(N) / SR
    held_db = np.maximum.accumulate(over_db + ramp) - ramp
    return x * amplitude_ratio(uniform_filter1d(minimum_filter1d(-held_db, size=45), size=45))


def low_pass(x):
    """Removes everything above the highest recorded frequency."""
    return signal.sosfilt(signal.butter(12, 16730, fs=SR, output="sos"), x)


def record(dry):
    """Linear filtering, then limiting: bass and top are cut and peaks are held just under full scale."""
    cut = signal.sosfilt(signal.butter(4, 48, "high", fs=SR, output="sos"), dry)
    cut = signal.sosfilt(signal.cheby2(12, 50, 16270, fs=SR, output="sos"), cut)
    cut = cut - 0.76 * resonate(cut, hz=3595, width_hz=1870)    # a broad dip in the spectrum near 3.6 kHz
    mix = limiter(cut, top=.99, release_db_s=500)
    return low_pass(mix)


dry = scene()
out = record(dry)
wav_record(out)
```